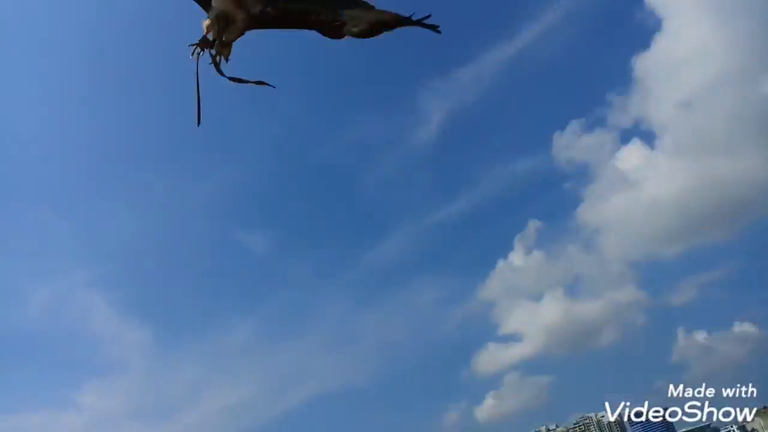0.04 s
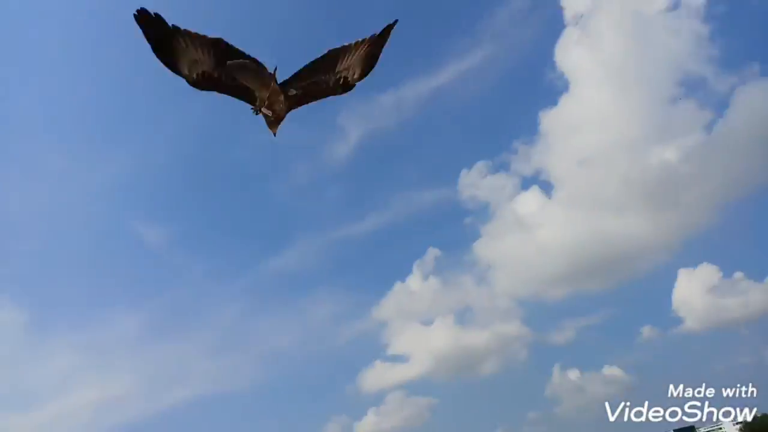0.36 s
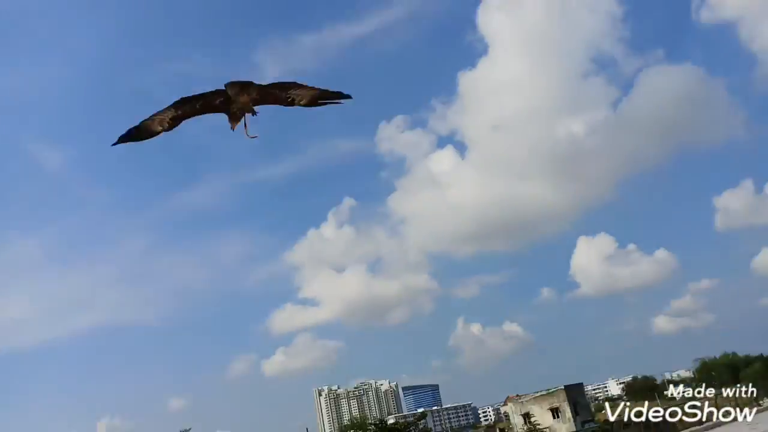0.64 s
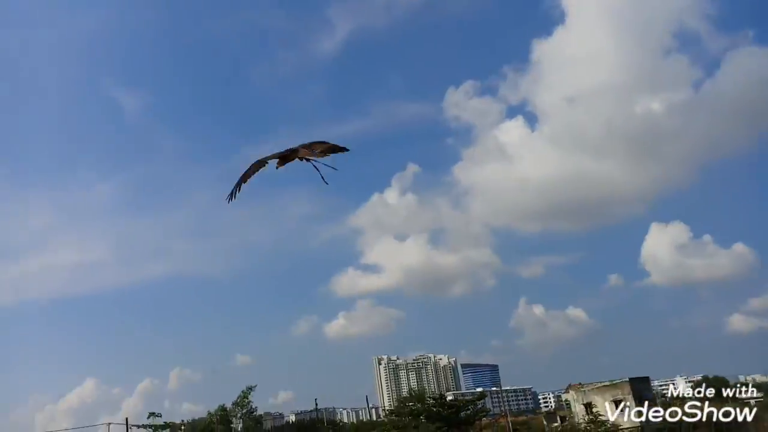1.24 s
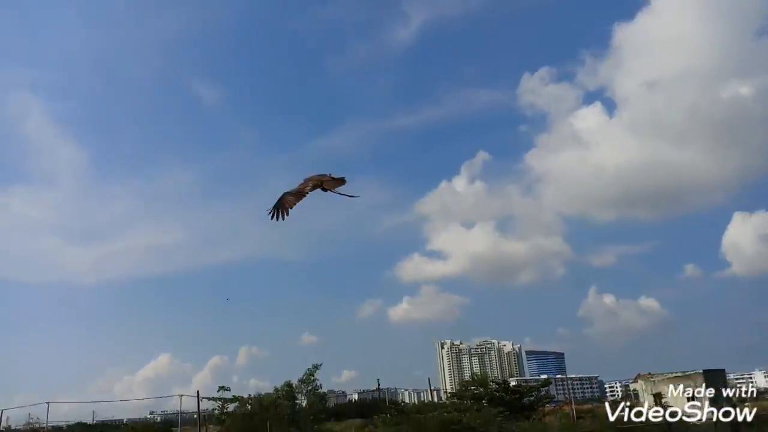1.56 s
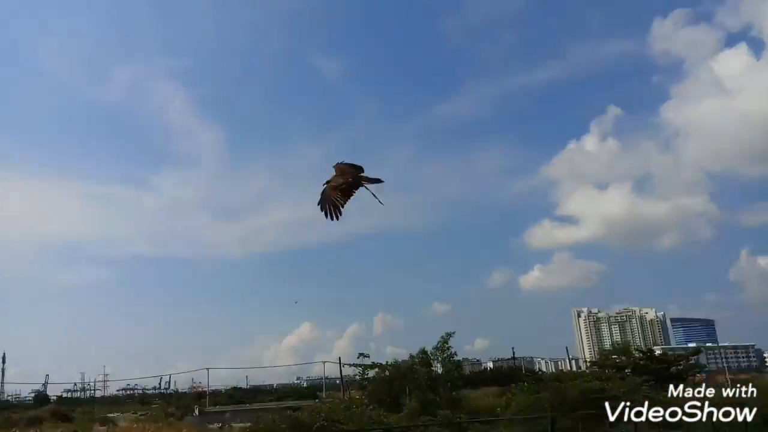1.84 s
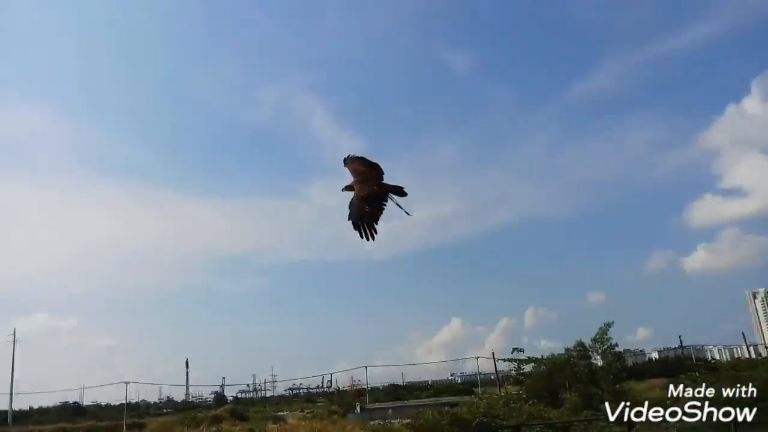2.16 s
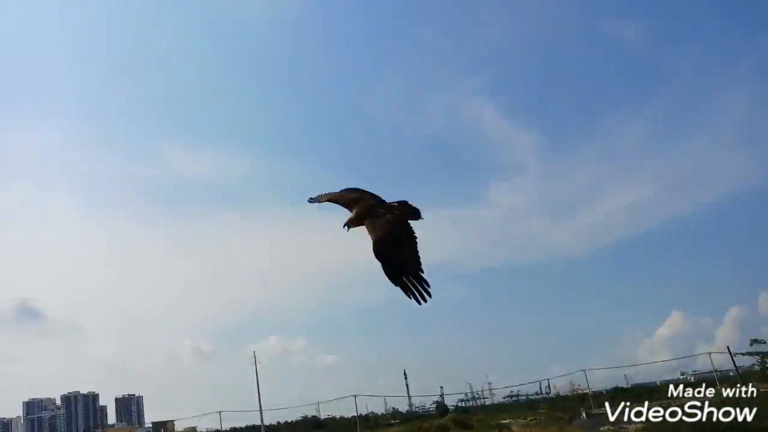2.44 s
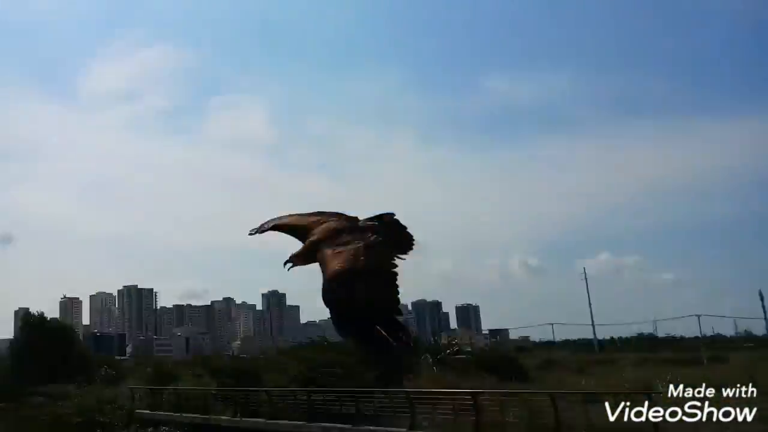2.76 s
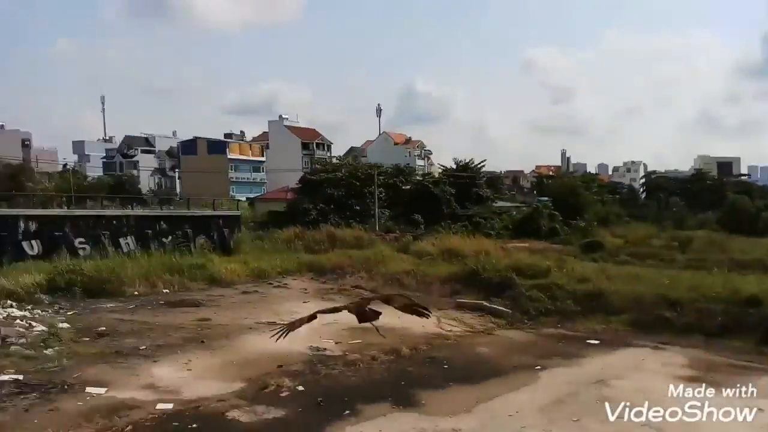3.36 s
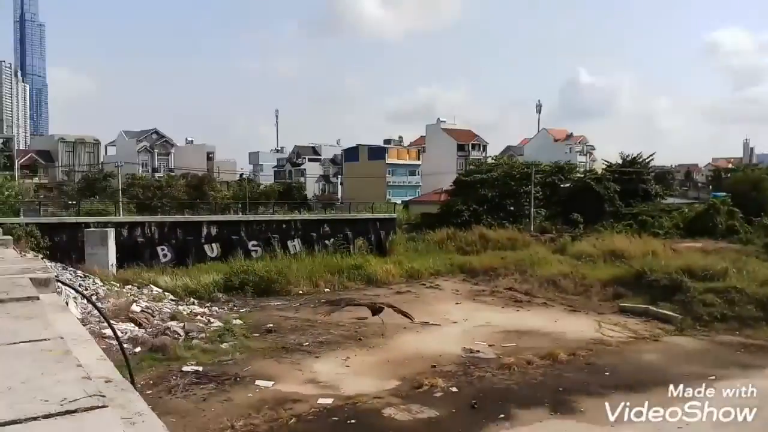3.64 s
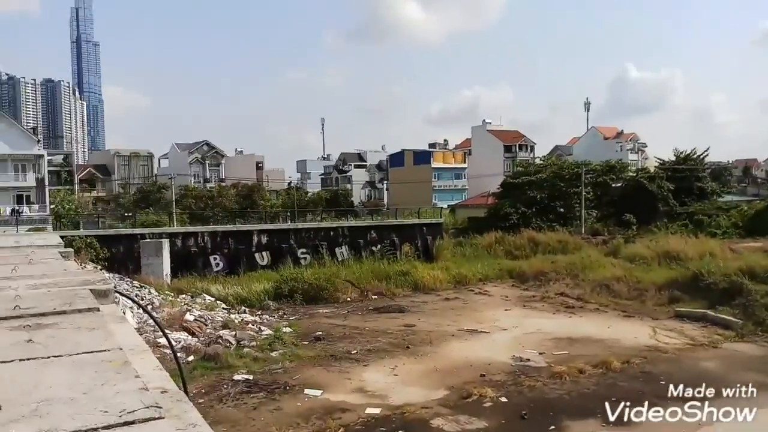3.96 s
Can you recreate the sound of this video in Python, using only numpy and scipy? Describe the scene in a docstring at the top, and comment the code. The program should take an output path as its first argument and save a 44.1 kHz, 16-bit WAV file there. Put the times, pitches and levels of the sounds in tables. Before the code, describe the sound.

A bird of prey squawks about ten times in quick succession, each call a thin high whistle over a harsh rasp. Outdoors, wind buffets the microphone in the first half, with a few light knocks and a distant town murmur.

```python
"""A bird of prey squawks ten times as it circles over open waste ground. Each squawk opens with a rising
croak, holds a thin whistle over a harsh rasp, and breaks into a falling croak, often through a squeal.
A vibrating membrane gives the whistle; pulses and air filtered by the throat give the rasp and croaks.
The calls reflect from the ground and far walls. Gusts buffet the microphone, the camera is knocked a
few times, and a town murmurs far away, with soft swells of hiss and two faint chirps."""
import sys
import numpy as np
from scipy import signal
from scipy.fft import rfft, irfft, next_fast_len
from scipy.io import wavfile
from scipy.ndimage import map_coordinates

SR = 44100
rng = np.random.default_rng(int(sys.argv[2]) if len(sys.argv) > 2 else 0)


def waveform_to_disk(signal):
    """Save audio, clipped to [-1, 1], as 16-bit WAV at the path in sys.argv[1]."""
    frames = np.transpose(np.atleast_2d(signal))
    scaled = np.clip(frames, -1, 1) * 32767
    samples = np.round(scaled).astype(np.int16)
    wavfile.write(sys.argv[1], SR, samples)


N = 176400

# Spectral shapes of the town, the buffeting, the roar of hard gusts and the rub: frequency_hz, gain_db
TOWN_SPECTRUM = [(20, -10), (100, 3.5), (200, -2.5), (430, 2), (800, -7), (1400, -13), (2200, -13.5),
                 (3500, -12.5), (4800, -12.5), (6000, -18.5), (9000, -30), (11000, -39), (14000, -35.5)]
BUFFET_SPECTRUM = [(20, -26.5), (54, -1.5), (109, 3), (206, -5), (290, -14.5), (444, -25), (640, -43),
                   (1200, -56.5), (2500, -45), (8000, -47), (11000, -75)]
ROAR_SPECTRUM = [(100, -18), (220, 3), (450, -5), (700, -15), (1200, -35), (3000, -56)]
SCUFF_SPECTRUM = [(1500, -4), (4000, -3), (8000, -15), (11500, 6), (13000, -9)]
# Envelopes of the town's murmur and of the gusts: time_s, level_db
TOWN_LEVEL = [(0, -59.5), (.7, -66), (1.3, -56.5), (2, -53), (2.7, -53.5), (3.4, -55), (4, -56.5)]
GUST_LEVEL = [(0.0, -34.5), (0.07, -54.5), (0.12, -50), (0.21, -55.5), (0.29, -44.5), (0.41, -46.5),
              (0.47, -65), (0.59, -48.5), (0.63, -62), (0.71, -51.5), (0.82, -54.5), (0.88, -36.5),
              (0.92, -45.5), (1.18, -36.5), (1.2, -42), (1.29, -36), (1.44, -35), (1.47, -41.5),
              (1.55, -27.5), (1.61, -25.5), (1.66, -33.5), (1.75, -40), (1.92, -35), (2.02, -56.5),
              (2.18, -60.5), (2.31, -43), (2.37, -63), (2.39, -39.5), (2.45, -65), (2.49, -51),
              (2.72, -63.5), (2.76, -52), (2.85, -60), (3.15, -70), (3.92, -72), (4.0, -64)]
# The side that the wind strikes: time_s, left_over_right_db
GUST_SIDE = [(0, 17), (.82, 11), (.95, 4.5), (1.48, 2.5), (1.57, 14.5), (1.88, 3.5), (4, 3)]
# Swells of hiss: peak_s, width_s, level_db, left_over_right_db, top_edge_hz
HISSES = [(1.3, 0.39, -58, -11.5, 5400), (3.6, 0.053, -55, 0.5, 11600)]
# Taps on the camera: start_s, level_db, left_over_right_db, ring_hz
KNOCKS = [(.003, -38, 29, 435), (0.1125, -22, -45, 1840), (.119, -39.5, -12, 1490),
          (0.14, -39.5, -19, 1770), (0.393, -35, -24, 2000), (0.525, -42, -21, 456), (2.396, -44, -12, 250),
          (3.387, -45, 5, 1000)]
# Falling glides, far chirps and the bird's squeals: start_s, end_s, from_hz, to_hz, level_db
CHIRPS = [(1.432, 1.463, 3940, 2960, -54.5), (1.466, 1.498, 4260, 3780, -55)]
SQUEALS = [(0.067, 0.115, 3797, 3423, -32.5), (.493, 0.521, 3630, 3286, -43),
           (0.508, 0.533, 2740, 2450, -49), (0.919, 0.948, 3640, 3520, -47),
           (0.934, 0.962, 2966, 2246, -44), (1.338, 1.362, 3650, 3520, -46),
           (1.348, 1.378, 3040, 2220, -41), (1.761, 1.795, 3760, 3350, -32),
           (2.287, 2.319, 3720, 3420, -41.5), (2.72, 2.739, 3650, 3230, -43),
           (3.23, 3.248, 3480, 3070, -36), (3.235, 3.252, 2600, 2320, -42),
           (3.738, 3.759, 3350, 3114, -44.5)]
# Strength of the reflections from the ground and from far walls: frequency_hz, gain_db
GROUND_REFLECTION = [(3300, -1), (4200, -4.5), (4900, -7.5), (6000, -2.5)]
WALL_REFLECTION = [(4300, -21.5), (4900, -19), (5800, -21), (9500, -20)]
# The bird's bearing, as the delay at the right microphone port: time_s, delay_s
BEARING_DELAY = [(0, 0.00025), (.25, 0.00028), (1.4, 0.00029), (1.9, 0.00025), (2.4, 0.00025),
                 (2.5, 0.00025), (2.8, 0.00025), (2.9, 0.00026), (4, 0.00026)]
# Further phase lag of the right port, from the camera's case: frequency_hz, lag_rad
PORT_LAG = [(2400, 0.022), (3400, -0.68), (3900, 0.034), (4700, -0.18), (5400, 0.42), (6500, -0.18),
            (8500, -0.56)]
# Throat resonances of the rasp, its lower layer and the croaks: frequency_hz, gain_db
RASP_THROAT = [(300, -42), (1000, -37.5), (1500, -21.5), (2300, -29), (2930, -1), (3250, 2.5), (3640, -1),
               (3950, -4), (4400, -3.5), (5500, -4), (6700, -12.5), (7700, -16.5), (8500, -19.5),
               (9600, -19.5), (11000, -58.5)]
LOW_THROAT = [(1000, -34), (2300, -17), (2650, -8.5), (2870, -3), (3150, 3), (3500, -23), (6000, -48)]
CROAK_THROAT = [(300, -40), (1000, -16), (1500, -19), (2200, -14.5), (2900, -0.5), (3500, 0.5),
                (4300, -0.5), (5000, -8), (6200, -5), (7900, -14), (9200, -21), (11000, -35.5)]
# The lower resonance against the rasp, opening in the later squawks: time_s, gain_db
GAPE = [(0, -9.5), (2.8, -36), (3.05, 5.5), (3.25, -15), (3.5, -4.5), (4, 3)]
# Directivity of the whistle's octave and the sidebands as the bird turns: time_s, gain_db
FACING = [(0, 7), (.45, -4), (.85, -5.5), (1.3, -9.5), (1.7, -4), (2.1, 1.5), (2.3, 5.5), (2.7, 6.5),
          (3, 13.5), (3.3, -33), (4, -20)]
# Timing and base levels of each squawk: start_s, whistle_on_s, whistle_off_s, end_s,
# opening_croak_db, early_rasp_db, late_rasp_db, closing_croak_db, left_over_right_db
SQUAWKS = [(-0.05, -0.023, 0.071, 0.135, -47, -45, -41.5, -40, 0),
           (0.27, 0.3, 0.515, 0.545, -42.5, -50, -43, -47.5, 0.5),
           (0.703, 0.746, 0.935, 0.975, -49, -56, -46, -45.5, 3.5),
           (1.13, 1.169, 1.352, 1.39, -45.5, -49.5, -39.5, -45.5, 3.5),
           (1.522, 1.562, 1.772, 1.822, -47.5, -51, -39, -41.5, 0),
           (2.002, 2.04, 2.298, 2.342, -46, -50.5, -42, -41.5, 0.5),
           (2.455, 2.483, 2.719, 2.751, -45, -44.5, -35.5, -35.5, 0.5),
           (2.896, 2.931, 3.228, 3.268, -39, -50, -36.5, -43, 0.5),
           (3.432, 3.465, 3.744, 3.778, -52.5, -61, -50.5, -56, -0.5),
           (3.935, 3.955, 4.05, 4.08, -60.5, -64, -91, -61, 0)]
# Whistle contours, one list for each squawk: time_s, pitch_hz, base_level_db
WHISTLES = [
    [(0.004, 5220, -34.5), (0.026, 5254, -43), (0.044, 5364, -31), (0.065, 5330, -44)],
    [(0.308, 5600, -41), (0.325, 5644, -39), (0.356, 5090, -40.5), (0.39, 4900, -42), (0.438, 4780, -36),
     (0.447, 4830, -40), (0.478, 4880, -38), (0.509, 4705, -48.5)],
    [(0.75, 5000, -44), (0.772, 5040, -37.5), (0.785, 4905, -59), (0.798, 4915, -44.5),
     (0.842, 5025, -40.5), (0.877, 4980, -37.5), (0.92, 4690, -42.5), (0.929, 4640, -42)],
    [(1.176, 5113, -36), (1.21, 5040, -40), (1.232, 5072, -37), (1.25, 4977, -43), (1.28, 5020, -36),
     (1.293, 4884, -32), (1.31, 4874, -35), (1.347, 4648, -41)],
    [(1.567, 5140, -35.5), (1.58, 5130, -36), (1.602, 5044, -39.5), (1.628, 4985, -43.5),
     (1.667, 5110, -38.5), (1.702, 4940, -44), (1.715, 5013, -46), (1.766, 4766, -38.5)],
    [(2.046, 5116, -45.5), (2.064, 5134, -40.5), (2.094, 5003, -52), (2.116, 4970, -57),
     (2.173, 4997, -46.5), (2.242, 4900, -41.5), (2.264, 4763, -39.5), (2.293, 4630, -37)],
    [(2.492, 4810, -37), (2.509, 4975, -36.5), (2.522, 4880, -34.5), (2.557, 4812, -33.5),
     (2.588, 4852, -34.5), (2.635, 4828, -28.5), (2.683, 4634, -31.5), (2.714, 4586, -34.5)],
    [(2.94, 4773, -37), (2.953, 4907, -37), (2.984, 4780, -46.5), (2.997, 4840, -39.5), (3.097, 4727, -33),
     (3.154, 4674, -39), (3.188, 4607, -33), (3.222, 4413, -41)],
    [(3.471, 4736, -53.5), (3.498, 4788, -51.5), (3.532, 4625, -59.5), (3.576, 4727, -54),
     (3.624, 4782, -47), (3.672, 4574, -54), (3.733, 4447, -51), (3.738, 4230, -47)],
    [(3.971, 4810, -56), (3.975, 4910, -51), (3.992, 4920, -52.5)],
]
# Frequency response of the microphone: frequency_hz, gain_db
MICROPHONE = [(20, -1), (9700, -2), (10400, -8), (11200, -17), (13000, -32.5)]

EDGE_S = 0.008  # fade at each end of a short sound
WHISTLE_GAIN_DB, RASP_GAIN_DB, UNDERTONE_GAIN_DB = 1.5, -3, -9.5
OCTAVE_DB, OCTAVE_SWELL_DB, SIDEBAND_DB = -26, 4.5, -18
GROUND_T60_S, WALL_T60_S = 0.064, 0.63
BAND_LIMIT_HZ = 12920


def amp(db):
    """Amplitude ratio of a level in decibels."""
    return 10 ** (np.asarray(db) / 20)


def unit(x):
    """Normalisation to unit mean power."""
    return x / np.sqrt(np.mean(x ** 2) + 1e-20)


def sides(db):
    """Level difference: left and right gains of unit mean power."""
    return unit(amp([[db / 2], [-db / 2]]))


def lookup(table, at):
    """Linear interpolation in a two-column table."""
    return np.interp(at, *np.transpose(table))


def filtered(x, response):
    """Zero-phase filtering of a full-length sound by a frequency response."""
    return irfft(rfft(x) * amp(lookup(response, np.fft.rfftfreq(N, 1 / SR))), N)


def colour(x, spectrum):
    """Spectral shaping over log frequency, at unit power."""
    hz, db = np.transpose(spectrum)
    size = next_fast_len(len(x) + 512)
    gain = amp(np.interp(np.log(np.fft.rfftfreq(size, 1 / SR) + 1), np.log(hz), db))
    return unit(irfft(rfft(x, size) * gain, size)[:len(x)])


def wander(size, rate_hz):
    """Smooth random fluctuation: low-passed noise of unit spread."""
    n = next_fast_len(size + 4096)
    lowpass = np.exp(-(np.fft.rfftfreq(n, 1 / SR) / rate_hz) ** 2)
    return unit(irfft(rfft(rng.standard_normal(n)) * lowpass, n))[:size]


def span(start, end, rise_s=EDGE_S, fall_s=EDGE_S):
    """Sample times of a sound and its gate, with quarter-sine fades."""
    t = np.arange(round(start * SR), round(end * SR)) / SR
    ramp = np.clip(np.minimum((t - start) / rise_s, (end - t) / fall_s), 0, 1)
    return t, np.sin(np.pi / 2 * ramp)


def add(mix, start_s, sound):
    """Superposition of a sound on the mix at its time."""
    at = round(start_s * SR)
    sound = sound[..., max(-at, 0):]
    part = mix[:, max(at, 0):][:, :sound.shape[-1]]
    part += sound[..., :part.shape[1]]


def diffuse_noise(spectrum, shared):
    """Partial coherence: coloured noise with a part common to both sides."""
    common = rng.standard_normal(N)
    return np.array([colour(shared * common + rng.standard_normal(N), spectrum) for _ in range(2)])


def town():
    """The far town murmurs as a diffuse field of wavering level."""
    murmur = sides(-1.1) * diffuse_noise(TOWN_SPECTRUM, shared=0.44)
    return murmur * amp(lookup(TOWN_LEVEL, np.arange(N) / SR) + 1.77 * wander(N, 21.3))


def hiss():
    """Broadband noise swells and fades under Gaussian envelopes."""
    out, t = np.zeros((2, N)), np.arange(N) / SR
    for peak_s, width_s, db, pan_db, top_hz in HISSES:
        spectrum = [(1000, -8), (top_hz * 0.44, 0), (top_hz, -5), (top_hz * 1.7, -16), (top_hz * 2, -35)]
        swell = amp(db) * np.exp(-.5 * ((t - peak_s) / width_s) ** 2)
        out += sides(pan_db) * swell * diffuse_noise(spectrum, shared=0.14)
    return out


def far_chirps():
    """Faint falling tones, placed to the right by a level difference."""
    out = np.zeros((2, N))
    for start, end, from_hz, to_hz, db in CHIRPS:
        t, gate = span(start, end)
        chirp = membrane_tone(np.interp(t, [start, end], [from_hz, to_hz]), jitter=0.047, flutter_db=5)
        add(out, t[0], sides(-17) * amp(db) * gate * chirp)
    return out


def wind():
    """Turbulence buffets each port with independent noise; hard gusts add a higher roar."""
    t = np.arange(N) / SR
    gust_db, left_gain = lookup(GUST_LEVEL, t), amp(lookup(GUST_SIDE, t))
    roar_db = -37.5 + 1.87 * (gust_db + 25)  # the roar grows faster than the gust
    mean_gain = np.sqrt((left_gain ** 2 + 1) / 2)
    ports = []
    for gain in left_gain, 1:
        lumps = unit(amp(3 * wander(N, 10.7) + 2.5 * wander(N, 80)))
        buffet = amp(gust_db + 2.5) * colour(rng.standard_normal(N), BUFFET_SPECTRUM)
        roar = amp(roar_db) * colour(rng.standard_normal(N), ROAR_SPECTRUM)
        ports.append(gain / mean_gain * lumps * (buffet + roar))
    return np.array(ports)


def knocks(body_hz=270):
    """Impacts on the camera excite two heavily damped modes and a burst of grit."""
    out, t = np.zeros((2, N)), np.arange(2048) / SR
    body = np.sin(2 * np.pi * body_hz * t) * np.exp(-t / 0.0018)
    for start, db, pan_db, ring_hz in KNOCKS:
        ring = np.sin(2 * np.pi * ring_hz * t) * np.exp(-t / 0.002)
        spectrum = [(100, 0), (ring_hz, 0), (ring_hz * 1.6, -14), (12000, -24)]
        grit = 0.58 * colour(rng.standard_normal(len(t)), spectrum) * np.exp(-t / 0.0035)
        add(out, start, sides(pan_db) * amp(db) * (body + ring + grit))
    return out


def scuff(start_s=0.091, decay_s=0.023, level_db=-38):
    """Friction noise: a bright, decaying rub as the camera is knocked."""
    out = np.zeros((2, N))
    t, gate = span(start_s, start_s + 5 * decay_s)
    envelope = amp(level_db) * gate * np.exp((start_s + EDGE_S - t) / decay_s)
    add(out, start_s, sides(-16) * envelope * colour(rng.standard_normal(len(t)), SCUFF_SPECTRUM))
    return out


def reflections(calls, response, t60_s, taps_per_s):
    """Scattering: sparse echoes, different at each port, die away exponentially."""
    t = np.arange(SR) / SR
    taps = rng.standard_normal((2, SR)) * (rng.random((2, SR)) < taps_per_s / SR)
    taps *= amp(-60 * t / t60_s) * (t > .001)
    taps /= np.linalg.norm(taps, axis=1, keepdims=True) + 1e-12
    return signal.fftconvolve(filtered(calls, response), taps, axes=1)[:, :N]


def direct_path(calls):
    """Path difference delays the right port, and the camera's case shifts its phase."""
    n = np.arange(N)
    delayed = map_coordinates(calls[1], [n - SR * lookup(BEARING_DELAY, n / SR)], order=3)
    lag_rad = lookup(PORT_LAG, np.fft.rfftfreq(N, 1 / SR))
    return np.array([calls[0], irfft(rfft(delayed) * np.exp(-1j * lag_rad), N)])


def membrane_tone(hz, jitter, flutter_db, overtones_db=()):
    """A quivering membrane: a harmonic tone modulated at random in frequency and amplitude."""
    phase = 2 * np.pi * np.cumsum(hz * (1 + jitter * wander(len(hz), 700))) / SR
    wave = np.sin(phase) + sum(amp(db) * np.sin(k * phase) for k, db in enumerate(overtones_db, 2))
    return unit(wave * amp(flutter_db * wander(len(hz), 64)))


def throat_pulses(hz, throat, jitter=0.0497, breath=.35, flutter_db=3):
    """Source and filter: unsteady pulses and puffs of air excite the throat's resonances."""
    size = len(hz)
    phase = 2 * np.pi * np.cumsum(hz * (1 + jitter * wander(size, 426))) / SR
    pulses = unit(sum(np.cos(k * phase) for k in range(1, 12)))
    puffs = unit((1 + np.cos(phase)) * rng.standard_normal(size))
    source = (1 - breath) * pulses + breath * puffs
    return colour(source * amp(flutter_db * wander(size, 350)), throat)


def croak(start, end, glide_hz, db, rise_s, fall_s, jitter, breath):
    """The pulse rate glides beneath steady formants. Returns the start time and the sound."""
    t, gate = span(start, end, rise_s, fall_s)
    pitch_hz = np.interp(t, [start, end], glide_hz)
    return t[0], gate * amp(db) * throat_pulses(pitch_hz, CROAK_THROAT, jitter, breath)


def rasp(t, whistle_hz, effort_db):
    """Subharmonic pulses near a quarter and a fifth of the whistle's pitch, with a rough undertone."""
    upper = throat_pulses(whistle_hz / 4, RASP_THROAT)
    lower = amp(lookup(GAPE, t)) * throat_pulses(whistle_hz / 5, LOW_THROAT)
    undertone_hz = 3655 + .6 * (whistle_hz - 4877)
    undertone = membrane_tone(undertone_hz, jitter=.031, flutter_db=6.5)
    return amp(effort_db) * (amp(RASP_GAIN_DB) * (upper + lower) + amp(UNDERTONE_GAIN_DB) * undertone)


def rasping_whistle(on, off, contour, open_db, early_db, late_db):
    """Modulation by the rasp throws sidebands above the whistle. Returns the start time and the sound."""
    t, gate = span(on - EDGE_S / 2, off + EDGE_S / 2)
    times, hz, db = np.transpose(contour)
    pitch_hz, level_db = np.interp(t, times, hz), np.interp(t, times, db) + WHISTLE_GAIN_DB
    progress, facing_db = (t - on) / (off - on), lookup(FACING, t)
    octave_db = OCTAVE_DB + facing_db + OCTAVE_SWELL_DB * (2 * progress ** 2 - 1)
    whistle = membrane_tone(pitch_hz, jitter=0.0068, flutter_db=1.5, overtones_db=[octave_db])
    effort_steps_db = [open_db - 3.5, early_db, early_db, late_db, late_db - 1.5]
    rasping = rasp(t, pitch_hz, np.interp(progress, [0, .2, .4, .75, 1], effort_steps_db))
    carrier = np.exp(2j * np.pi * np.cumsum(pitch_hz) / SR)
    sidebands = amp(SIDEBAND_DB + facing_db) * (signal.hilbert(rasping) * carrier).real
    return t[0], gate * (amp(level_db) * whistle + rasping + sidebands)


def squeals(reedy_below_hz=3000):
    """Register breaks: the whistle drops to falling tones, the lowest reedy with harmonics."""
    out = np.zeros((2, N))
    for start, end, from_hz, to_hz, db in SQUEALS:
        t, gate = span(start, end)
        pitch_hz = np.interp(t, [start, end], [from_hz, to_hz])
        overtones_db = [-3, -9.5] if to_hz < reedy_below_hz else [-17]
        squeal = membrane_tone(pitch_hz, jitter=.015, flutter_db=4, overtones_db=overtones_db)
        add(out, t[0], sides(1.3) * gate * amp(db) * squeal)
    return out


def squawks():
    """Three regimes of vibration in turn: rising croak, rasping whistle, falling croak."""
    out = np.zeros((2, N))
    for squawk, contour in zip(SQUAWKS, WHISTLES):
        start, on, off, end, open_db, early_db, late_db, close_db, pan_db = squawk
        held = rasping_whistle(on, off, contour, open_db, early_db, late_db)
        first_hz = contour[0][1]
        opening = croak(start, on + EDGE_S, glide_hz=(.168 * first_hz, .205 * first_hz), db=open_db + 1,
                        rise_s=0.02, fall_s=0.016, jitter=.025, breath=.24)
        closing = croak(off - EDGE_S, end, glide_hz=(997, 696), db=close_db + 0.5,
                        rise_s=0.022, fall_s=0.019, jitter=.045, breath=.3)
        for at, sound in opening, held, closing:
            add(out, at, sides(pan_db) * sound)
    return out


def scene():
    """Superposition of the bird's direct sound, its reflections and the surrounding noises."""
    calls = squawks() + squeals()
    ground = reflections(calls, GROUND_REFLECTION, GROUND_T60_S, taps_per_s=1400)
    walls = reflections(calls, WALL_REFLECTION, WALL_T60_S, taps_per_s=760)
    surroundings = far_chirps() + wind() + town() + hiss() + knocks() + scuff()
    return direct_path(calls) + ground + walls + surroundings


def record(dry):
    """The microphone's response dulls the treble, and a low-pass filter limits the band."""
    lowpass = signal.firwin(255, BAND_LIMIT_HZ, window=("kaiser", 9), fs=SR)
    return signal.oaconvolve(filtered(dry, MICROPHONE), lowpass[None], "same")


dry = scene()
out = record(dry)
waveform_to_disk(out)
```